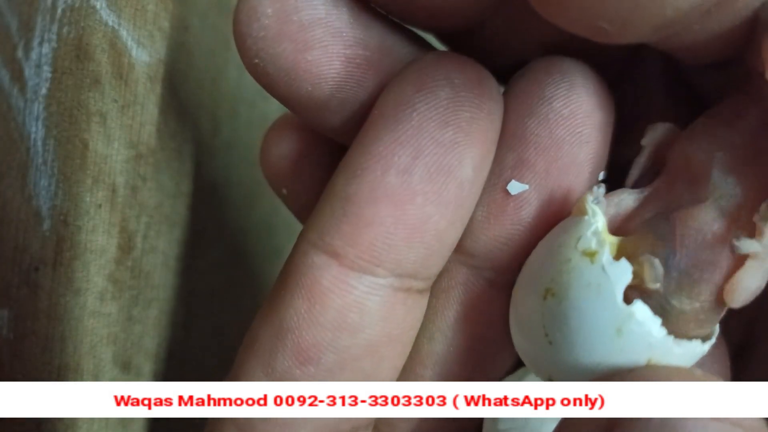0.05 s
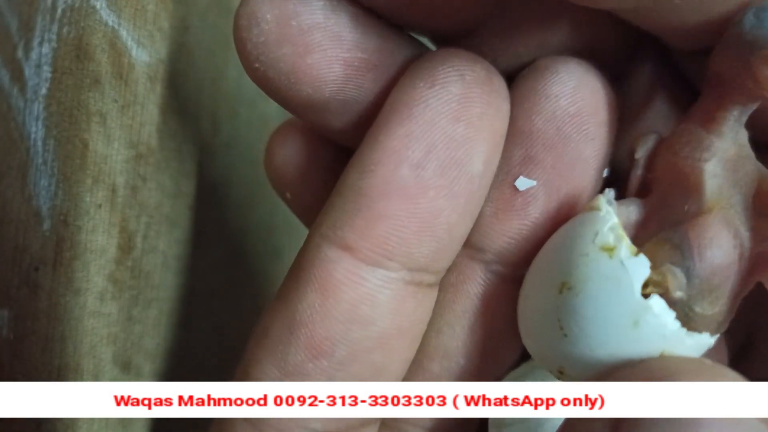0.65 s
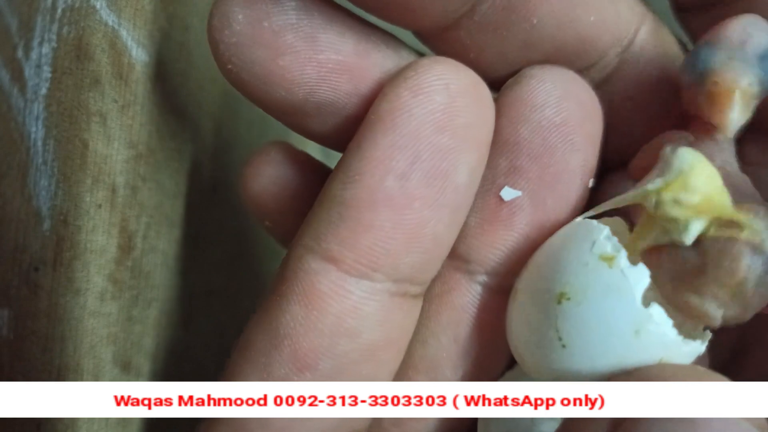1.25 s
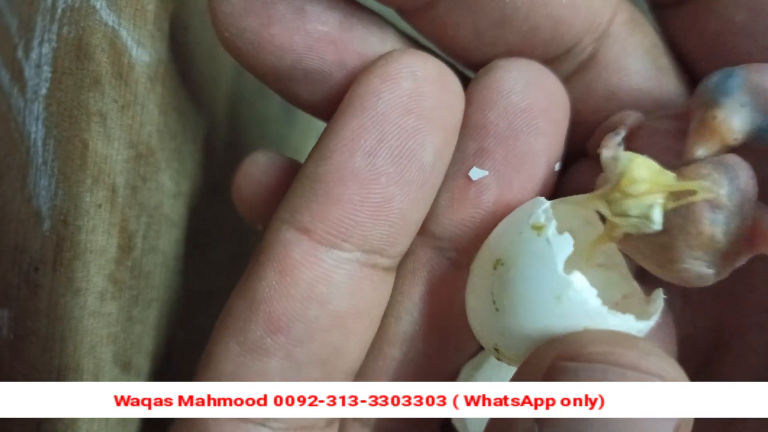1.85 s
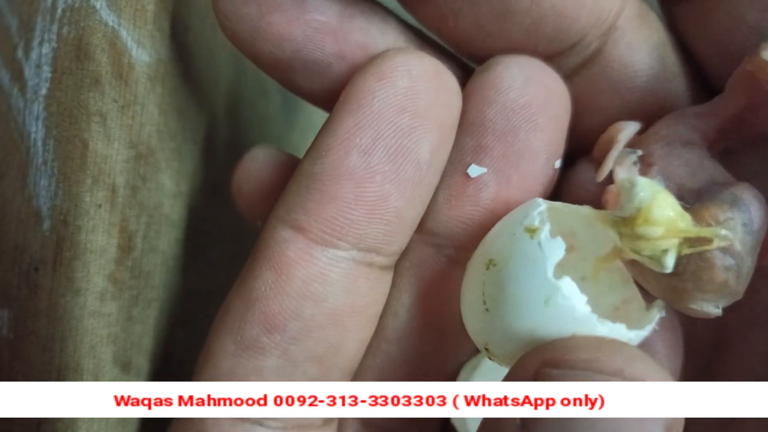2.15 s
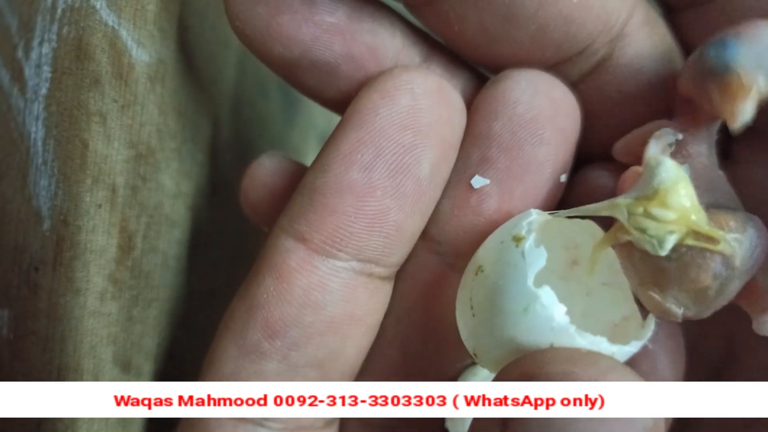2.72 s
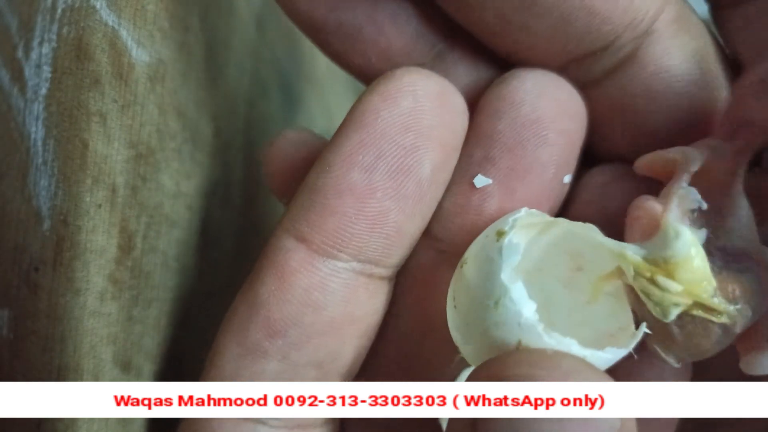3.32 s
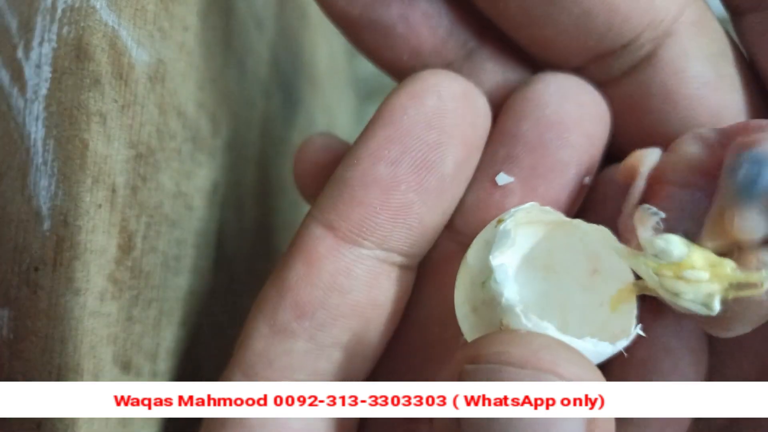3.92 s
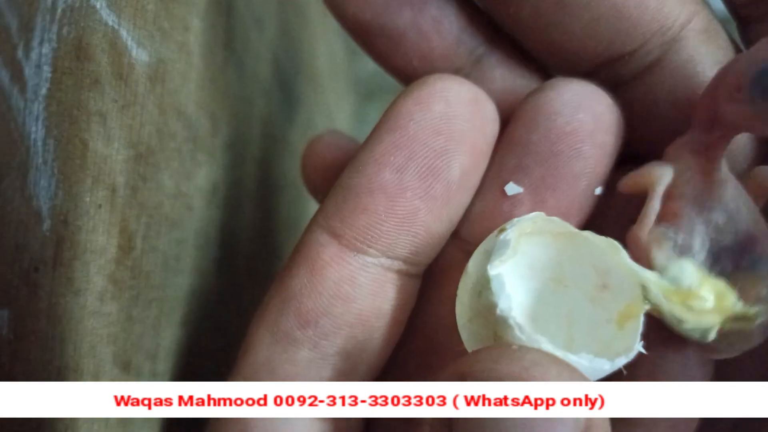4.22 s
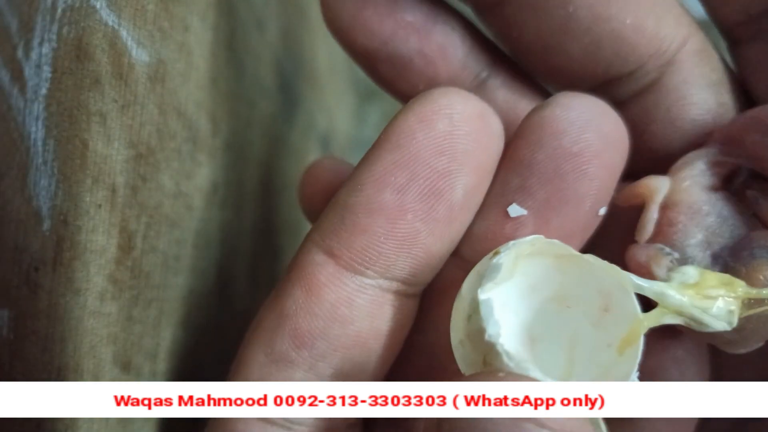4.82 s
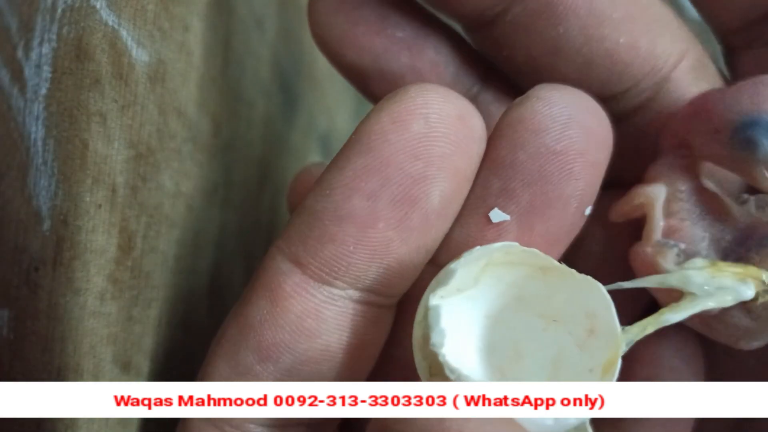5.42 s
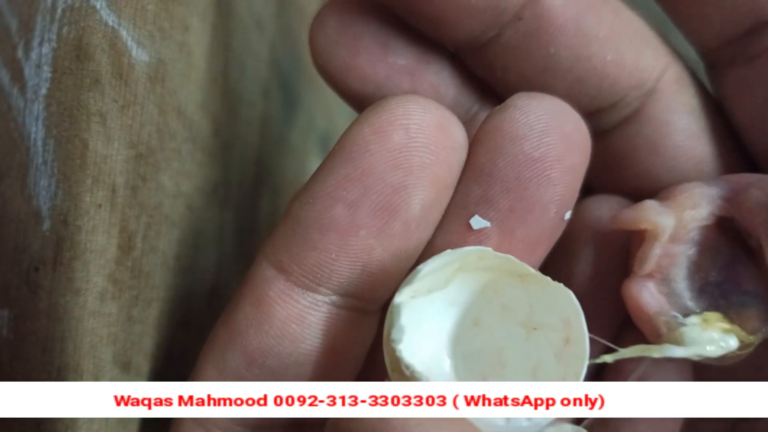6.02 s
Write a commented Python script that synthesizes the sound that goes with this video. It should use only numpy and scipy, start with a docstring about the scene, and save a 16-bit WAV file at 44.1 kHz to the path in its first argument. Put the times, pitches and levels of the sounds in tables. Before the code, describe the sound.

Parakeets squawk close to a stereo microphone in a hard-walled bird room. Each short call starts with a rasp, jumps to a shrill peak and slides down. The squawks come singly or in quick pairs, thickest in the middle. Between them are softer nasal whines, clear peeps and small falling chirps, while a faint flock whines further back over a steady low rumble.

```python
"""Parakeets squawk close to a stereo microphone in a hard-walled bird room. Each squawk starts as a low
rasp of the syrinx membrane, leaps to a shrill crest and slides down, fraying as the air pressure sags.
Between them come softer arched whines, clear peeps and short falling chirps; further back, a flock
whines over a low rumble. The walls smear every call; the recorder's gain control flattens the loudest."""
import sys
import numpy as np
from scipy import signal
from scipy.fft import rfft, irfft, next_fast_len
from scipy.io import wavfile
from scipy.ndimage import uniform_filter1d, minimum_filter1d

SR = 44100
rng = np.random.default_rng(int(sys.argv[2]) if len(sys.argv) > 2 else 0)


def transcribe(u):
    """Save the signal u as a 16-bit wav file named by the first command-line argument.

    u: samples, shape (n,) or (channels, n), limited to [-1, 1]; the rate is SR.
    q: integer samples, one column per channel.
    """
    v = np.clip(np.atleast_2d(u).T, -1, 1)
    q = np.round(v * 32767).astype(np.int16)
    wavfile.write(sys.argv[1], SR, q)


N = 267246

# spectrum of the room tone: (frequency [Hz], relative level [dB])
ROOM_TONE = [(25, -17.5), (50, -19.5), (80, -4.5), (130, 1), (190, -2.5), (300, -0.5), (500, -8), (850, -7),
             (1200, -14), (1900, -1.5), (2900, -12.5), (4200, -9.5), (5500, -16), (7300, -5.5),
             (9000, -28.5)]
# colour of the reverberant tail: (frequency [Hz], gain [dB])
TAIL_COLOUR = [(800, -8), (2000, -1), (3200, 2), (3800, 0), (4600, -2.5), (7000, -1), (12000, -4)]
# overall treble colour, with a deep dip around 10 kHz: (frequency [Hz], gain [dB])
TREBLE_SHAPE = [(8400, 3.5), (8800, -3.5), (9700, -23), (11100, -22.5), (11900, -5.5), (14000, -5),
                (15500, -19.5)]
# chirps, the low ones far off: (time [s], first pitch [Hz], fall [share of that pitch], level [dB])
CHIRP_CALLS = [ (1.269, 2480, 0.013, -35.5), (1.981, 2253, 0.19, -29.5), (2.263, 2682, 0.27, -29.5),
               (2.293, 2097, .32, -33.5), (2.385, 2410, .02, -32.5), (2.435, 874, 0.14, -45.5),
               (2.503, 2077, .3, -32.5), (2.522, 3474, .1, -31), (2.60, 1000, .12, -47),
               (3.467, 1890, 0.26, -33.5), (3.505, 2705, 0.032, -34.5), (3.871, 1784, 0.024, -29.5),
               (4.009, 1913, 0.29, -35)]
# hoarse nasal whines close by: (time [s], length [s], crest pitch [Hz], level [dB])
WHINE_CALLS = [ (.24, .14, 1928, -30.5), (.755, 0.22, 2185, -29.5), (1.19, 0.23, 2222, -33.5),
               (2.036, 0.27, 2208, -30), (2.60, 0.18, 2214, -26.5), (3.40, 0.17, 2303, -31.5),
               (4.66, 0.19, 2147, -25.5), (5.13, 0.15, 2156, -28.5), (5.495, .19, 2246, -25.5)]
# clear peeps close by: (time [s], length [s], crest pitch [Hz], level [dB])
PEEP_CALLS = [ (.713, 0.026, 2292, -22), (1.86, 0.047, 2290, -36), (2.478, 0.029, 2264, -27),
              (3.558, 0.049, 2176, -23.5), (4.762, 0.18, 2354, -16.5)]
# nearest squawks: (time [s], length [s], crest pitch [Hz], level [dB], bend of the fall [1 = straight])
SQUAWK_CALLS = [ (.325, .127, 2194, -11, 2.02), (1.450, 0.13, 2454, -10, 0.96),
                (1.560, 0.14, 2324, -14.5, 1.47), (2.677, 0.14, 2388, -11.5, 1.3),
                (2.828, 0.14, 2393, -12, 1.03), (3.068, 0.057, 2427, -10.5, 1.7),
                (3.100, 0.13, 2292, -9.5, 0.97), (3.625, 0.12, 2345, -11, 1.35),
                (3.680, .138, 2272, -12, 1.1), (4.202, 0.14, 2457, -10, 2.0),
                (4.912, .130, 2324, -12.5, 1.06), (5.858, 0.14, 2330, -12, 2.26)]
# throat and beak resonances for each kind of call: (frequency [Hz], gain [dB])
CHIRP_TRACT = [(1000, 3), (1700, 7), (2600, 5), (3400, -7.5), (5000, -29), (9000, -37.5)]
ARCH_TRACT = [(1000, -26), (1700, -4.5), (2300, -17), (2800, -35), (3600, -5), (4750, -10), (5200, -25),
              (6600, -15), (7500, -23), (9000, -34)]
SQUAWK_TRACT = [(500, -34.5), (750, -27), (1250, -24.5), (1600, -15), (2400, -17.5), (2750, -16),
                (3150, -0.5), (4700, -6), (5100, -19), (6500, -12.5), (7600, -13.5), (8800, -25.5)]

TOP_HZ = 15500


def undb(db):
    """Decibels to gain."""
    return 10 ** (np.asarray(db) / 20)


def unit(x):
    """Scale to rms 1."""
    return x / np.sqrt(np.mean(x ** 2) + 1e-18)


def gain_at(shape, hz):
    """Gain of a (frequency [Hz], gain [dB]) outline at the given frequencies."""
    points, db = np.transpose(shape)
    return undb(np.interp(np.log(hz + 1), np.log(points), db))


def colour(x, shape):
    """Filter by a (frequency [Hz], gain [dB]) outline."""
    size = next_fast_len(x.shape[-1] + 2048)
    hz = np.arange(size // 2 + 1) * SR / size
    return irfft(rfft(x, size) * gain_at(shape, hz), size)[..., :x.shape[-1]]


def wobble(t, rate):
    """Random drift of spread near 1 that turns rate times a second."""
    knots = rng.standard_normal(4096)
    return 1.2 * np.interp((t - t[0]) * rate, np.arange(len(knots)), knots)


def span(start, end):
    """Sample times of one call."""
    return start + np.arange(max(int((end - start) * SR), 64)) / SR


def fade(t, attack_s, release_s):
    """Rounded opening and closing of a call."""
    opening = np.sin(np.pi / 2 * np.clip((t - t[0]) / attack_s, 0, 1)) ** 2
    closing = np.sin(np.pi / 2 * np.clip((t[-1] - t) / release_s, 0, 1)) ** 2
    return opening * closing


def add(track, t, x):
    """Mix a call into a track at its time."""
    first = max(int(t[0] * SR), 0)
    part = track[first:first + len(x)]
    part += x[:len(part)]


def rumble(rumble_db=-43, hum_hz=144, hum_db=-59):
    """Room tone: low noise, near the centre in the bass, with a wavering hum and faint hiss."""
    t = np.arange(N) / SR
    mid, side = rng.standard_normal((2, N))
    side = colour(side, [(30, -1), (70, -9), (180, -8), (320, -9.5), (550, .5)])
    noise = unit(colour(mid + side * np.array([[1], [-1]]), ROOM_TONE))
    noise *= undb(rumble_db + .6 * wobble(t, 5))
    hum = np.sin(2 * np.pi * np.cumsum(hum_hz + 3 * wobble(t, 12)) / SR)
    return noise + hum * undb(hum_db + 5.3 * wobble(t, 4.6))


def room(x, direct_db, tail_db, bounce_db, bounces=20, t60_s=.47, treble_t60_s=.17, hold_s=.1):
    """Direct sound, hard wall reflections and a diffuse tail, different at each side of the microphone."""
    t = np.arange(SR) / SR
    low = signal.sosfilt(signal.butter(2, 6000, fs=SR, output="sos"), rng.standard_normal((2, SR)))
    high = signal.sosfilt(signal.butter(2, 6000, "high", fs=SR, output="sos"),
                          rng.standard_normal((2, SR)))
    # the tail builds and holds while sound first crosses the room, then dies away
    build = np.minimum(t / .025, 1)
    age = np.maximum(t - hold_s, 0)
    tail = (low * undb(-60 * age / t60_s) + high * undb(-60 * age / treble_t60_s)) * build
    response = colour(unit(tail), TAIL_COLOUR) / np.sqrt(SR) * undb(tail_db)
    for channel, direct_lag in zip(response, (12, 0)):  # samples: the left side hears it later
        lag_s = .0002 + .025 * rng.random(bounces) ** 2
        reflections = unit(rng.standard_normal(bounces) * np.exp(-lag_s / .044))
        channel[(lag_s * SR).astype(int)] += reflections * undb(bounce_db) / np.sqrt(bounces)
        channel[direct_lag] += undb(direct_db)
    return signal.fftconvolve(x[None], response, axes=1)[:, :N]


def syrinx(t, hz, throat, jitter, shimmer, breath, waver, harmonics=12):
    """Harmonics of an unsteady membrane and air noise pulsed by it, shaped by the throat."""
    # fast jitter frays the harmonics; the slower waver makes the pitch move in jerks
    pitch = hz * (1 + jitter * wobble(t, 1300) + waver * wobble(t, 260))
    phase = 2 * np.pi * np.cumsum(pitch) / SR
    k = np.arange(1, harmonics + 1)[:, None]
    tone = np.sum(np.sin(k * phase) * gain_at(throat, k * pitch.clip(1)) * (k * hz < TOP_HZ), axis=0)
    air = rng.standard_normal(SR)[:len(t)] * (1 + np.cos(phase))
    flutter = unit(np.exp(shimmer * (wobble(t, 750) + 1.3 * wobble(t, 200))))
    return (np.sqrt(2) * tone + breath * unit(colour(air, throat))) * flutter


def arched_call(start, length, crest_hz, rise_hz_per_s, hoarse):
    """One nasal whine or peep: the longer it is, the further its pitch climbs and sinks part way back."""
    t = span(start, start + length)
    rise_s, edge_s = .55 * length, .21 * length
    rise = np.clip(1 - (t - start) / rise_s, 0, 1)
    fall = np.clip((t - start - rise_s) / (length - rise_s), 0, 1)
    hz = crest_hz - rise_hz_per_s * rise_s * (rise ** 2 + .648 * fall ** 2)
    call = syrinx(t, hz, ARCH_TRACT, jitter=.027 * hoarse, shimmer=.25, breath=.2 * hoarse,
                  waver=.025 * hoarse, harmonics=6)
    return t, call * fade(t, edge_s, edge_s)


def flock(calls=34, level_db=-47):
    """Birds at the back of the room whine over one another."""
    out = np.zeros(N)
    for k, (when, length, pitch, softness) in enumerate(rng.random((calls, 4))):
        start = (k + when - 1) * N / SR / calls
        t, call = arched_call(start, .12 + .15 * length, 2130 + 130 * pitch,
                              rise_hz_per_s=2400, hoarse=.3)
        add(out, t, call * undb(-6 * softness))
    # at this distance their shrill second harmonic stands out less
    return unit(colour(out, [(2300, 6.5), (3800, -4.5), (7000, -2)])) * undb(level_db)


def chirps(length_s=.068):
    """Slightly husky whistles that slide down, some near and some far off."""
    out = np.zeros(N)
    for start, first_hz, fall, db in CHIRP_CALLS:
        t = span(start, start + length_s)
        hz = first_hz * (1 - fall * (t - start) / length_s)
        call = syrinx(t, hz, CHIRP_TRACT, jitter=.03, shimmer=.2, breath=.09, waver=.018, harmonics=2)
        add(out, t, call * fade(t, .008, .045) * undb(db))
    return out


def soft_calls(rows, rise_hz_per_s, hoarse):
    """The whines or peeps of birds close to the microphone."""
    out = np.zeros(N)
    for start, length, crest_hz, db in rows:
        t, call = arched_call(start, length, crest_hz, rise_hz_per_s, hoarse)
        add(out, t, call * undb(db))
    return out


def squawk_rasp(start, first_hz=680, climb_s=.045):
    """The opening of a squawk: the membrane vibrates chaotically in a low, climbing rasp."""
    t = span(start, start + climb_s * 1.3)
    climb = ((t - start) / climb_s) ** 2
    hz = first_hz * (1 + 1.1 * climb)
    rasp = unit(syrinx(t, hz, SQUAWK_TRACT, jitter=.0884, shimmer=.065, breath=.49, waver=.0304))
    # the slow, irregular first vibrations sound as a brief rising grunt
    grunt_hz = first_hz * (1 + .697 * climb + .18 * wobble(t, 800))
    grunt = np.sin(2 * np.pi * np.cumsum(grunt_hz) / SR)
    return t, rasp * fade(t, .044, .018) * undb(-4.5) + grunt * fade(t, .016, .064) * undb(-24)


def squawk_note(start, length, crest_hz, bend, leap_hz=291.1, fall_hz_per_s=9100, rough=.26):
    """The shrill part of a squawk: it leaps to its crest, then sinks and weakens."""
    delay_s, crest_s = .018, .05  # both from the start of the rasp
    t = span(start + delay_s, start + length)
    crest, fall_s = start + crest_s, length - crest_s
    rise = np.clip((crest - t) / (crest_s - delay_s), 0, 1)
    fall = np.clip((t - crest) / fall_s, 0, 1)
    hz = crest_hz - leap_hz * rise ** 2 - fall_hz_per_s * fall_s * fall ** bend
    # as the air pressure sags the note frays into noise
    fray = rough * (1 + 1.2 * fall ** 2)
    note = syrinx(t, hz, SQUAWK_TRACT, jitter=.055 * fray, shimmer=1.3 * rough, breath=.5 * fray,
                  waver=.05 * rough)
    return t, note * fade(t, .021, .015) * undb(-4.5 * fall ** 2)


def squawks():
    """The parakeets nearest the microphone: each rasp breaks into a shrill note."""
    out = np.zeros(N)
    for start, length, crest_hz, db, bend in SQUAWK_CALLS:
        for t, part in (squawk_rasp(start), squawk_note(start, length, crest_hz, bend)):
            add(out, t, part * undb(db))
    return out


def scene():
    """The room from the microphone's place: near birds arrive more directly, the flock mostly as echo."""
    loud = room(squawks(), direct_db=.5, tail_db=-2.5, bounce_db=-1)
    whines = soft_calls(WHINE_CALLS, rise_hz_per_s=4200, hoarse=.808)
    peeps = soft_calls(PEEP_CALLS, rise_hz_per_s=1300, hoarse=.32)
    soft = room(whines + peeps, direct_db=-5, tail_db=-5, bounce_db=-.5)
    clear = room(chirps(), direct_db=-4, tail_db=-7.5, bounce_db=-4.5)
    far = room(flock(), direct_db=-16, tail_db=0, bounce_db=-8)
    lean_right = undb([[-.4], [.4]])
    return (loud + soft + clear + far) * lean_right + rumble()


def record(dry, knee_db=-14, squeeze=.33, ceiling=.88):
    """Treble colour, gain control that eases loud calls down, a peak limiter and a steep top cut."""
    x = colour(dry, TREBLE_SHAPE)
    power = np.abs(uniform_filter1d(np.mean(x ** 2, axis=0), int(.063 * SR)))
    x = x * (1 + power / undb(knee_db) ** 2) ** (-squeeze / 2)
    limiter_gain = ceiling / np.maximum(np.abs(x).max(axis=0), ceiling)
    x = x * uniform_filter1d(minimum_filter1d(limiter_gain, size=200), size=200)
    return signal.sosfilt(signal.ellip(8, .2, 70, TOP_HZ, fs=SR, output="sos"), x)


dry = scene()
out = record(dry)
transcribe(out)
```